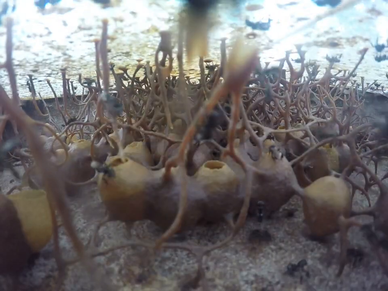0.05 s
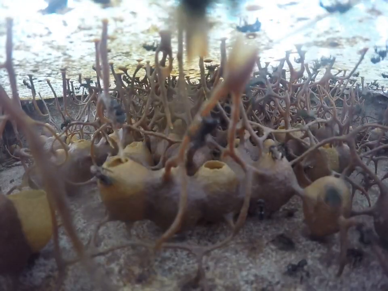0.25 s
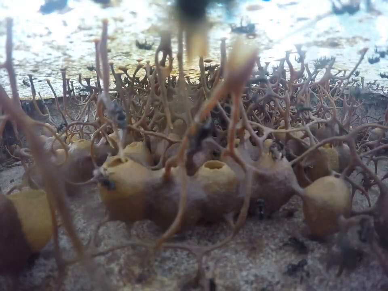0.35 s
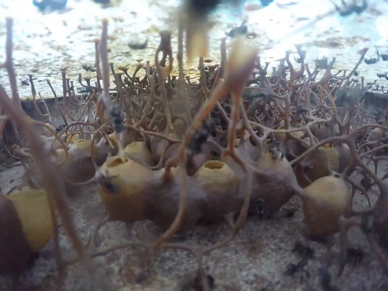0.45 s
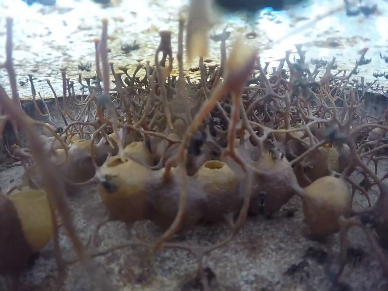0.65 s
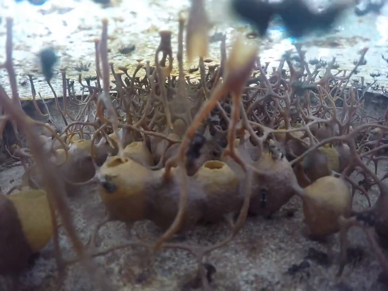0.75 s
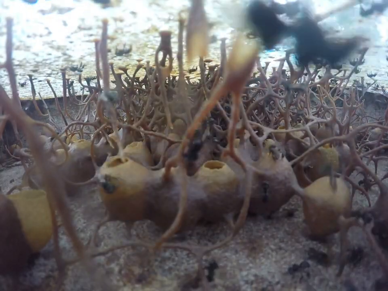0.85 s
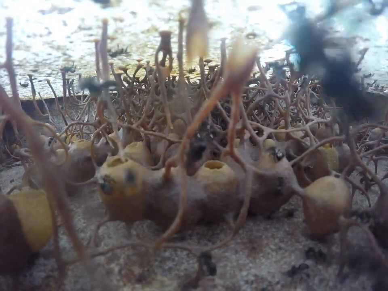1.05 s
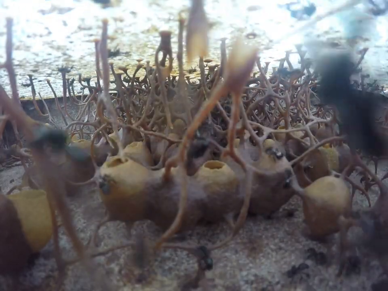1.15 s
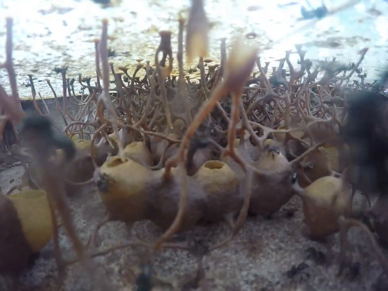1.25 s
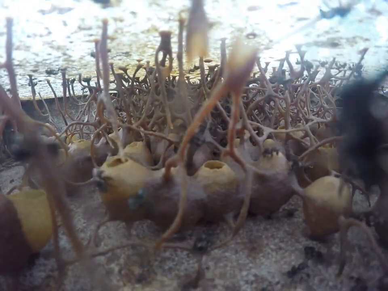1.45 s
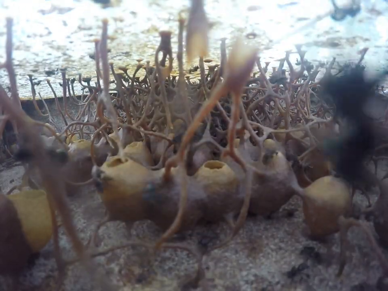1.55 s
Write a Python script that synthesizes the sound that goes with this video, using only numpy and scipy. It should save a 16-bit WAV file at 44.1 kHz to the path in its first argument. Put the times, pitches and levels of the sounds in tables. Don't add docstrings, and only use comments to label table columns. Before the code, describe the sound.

One brief harsh bee buzz against a hard shell, followed by tiny foot ticks and soft scraping

```python
import sys
import numpy as np
from scipy import signal
from scipy.fft import rfft, irfft
from scipy.io import wavfile

SR = 44100
rng = np.random.default_rng(int(sys.argv[2]) if len(sys.argv) > 2 else 0)


def file_out(sig):
    cols = np.atleast_2d(sig).T
    lim = np.clip(cols, -1, 1)
    pcm = np.round(lim * 32767).astype(np.int16)
    wavfile.write(sys.argv[1], SR, pcm)


def gain_from_decibels(decibels):
    exponent = np.asarray(decibels, float) / 20
    return 10 ** exponent


N = 70560

# (time [s], wingbeat [Hz], wing hum level [dB], slap level [dB])
BUZZ = [
    (0.185, 252.5, -72, -58),
    (0.197, 243.6, -52, -42.5),
    (0.226, 229, -50, -37.5),
    (0.232, 238.2, -47, -12),
    (0.243, 235.5, -44, -26.5),
    (0.297, 241, -42, -25),
    (0.321, 282.8, -46.5, -34),
    (0.33, 285, -62, -46),
    (0.346, 252, -81, -44.5),
]
# (multiple of wingbeat [1], level [dB])
OVERTONES = [(1, -24), (2, -19), (3, -14), (4, -11), (5, -10.5), (6, -9.5), (7, -13.5), (8, -5), (9, 1),
             (10, -1), (11, 3), (12, -4), (13, 0), (14, -4), (15, -10), (16, -14), (17, -16), (18, -16),
             (19, -15), (20, -16), (21, -18)]
# (time [s], peak level [dB])
BLOWS = [
    (.1999, -26),
    (.2290, -14.5),
    (.2332, -12),
    (.2374, -13),
]
# (frequency [Hz], level [dB], t60 [s])
SHELL_MODES = [(2110, -11, 0.019), (2550, 1.5, 0.0078), (3200, -4.5, 0.014), (3680, -3, 0.0075),
               (4800, 1, 0.0049), (6840, -0.5, 0.0058), (7740, 0, 0.003), (9790, -4.5, 0.0031),
               (12380, -20.5, 0.0096), (14600, -17.5, 0.0023)]
# (time [s], peak level [dB], pitch [Hz], share in the shell [dB])
TICKS = [(0.1472, -27.5, 2800, -18), (0.351, -33, 1990, -8), (0.363, -33, 2610, -16),
         (0.383, -46, 2720, -13), (0.423, -23, 1930, -10), (0.4317, -24, 6960, -12),
         (0.4363, -25, 3330, -3), (0.4406, -25.5, 4000, -2), (0.4556, -28, 2670, -14),
         (0.4735, -37, 2300, -12), (0.4930, -29.5, 1810, -9), (0.5125, -32, 1880, -14),
         (0.5242, -34, 3700, -8), (0.5791, -32.5, 1930, -20), (0.6186, -31, 2060, -3),
         (0.6284, -35, 1590, -10), (0.6386, -25, 1950, -8), (0.6454, -31, 1670, -11),
         (0.6485, -30, 2100, -14), (0.6610, -33, 1900, -10), (0.6712, -32, 2200, -6),
         (0.6770, -21.5, 2800, -10), (0.779, -35, 2700, -18), (0.7865, -36, 2720, -6),
         (0.9547, -28.5, 1800, -9.5), (0.9673, -32, 3000, -16), (0.9960, -39, 3000, -4),
         (1.0173, -39, 3300, -14), (1.0275, -27.5, 3960, -12), (1.0305, -30, 2900, -2),
         (1.0632, -24, 2920, -23), (1.1749, -29.5, 1430, -9), (1.1834, -29, 2900, 1.5),
         (1.1860, -32.5, 4500, 3), (1.2067, -29.5, 4800, 2.5), (1.2080, -28.5, 2700, 1),
         (1.2406, -30.5, 5500, 1.5), (1.3172, -31.5, 3020, -1), (1.3675, -33.5, 2580, 2),
         (1.3827, -29, 2980, -3), (1.4015, -28, 3250, -3.5)]
# (time [s], length [s], level [dB], pitch [Hz], share in the shell [dB])
SCRAPES = [(0.121, 0.019, -58, 3000, 10), (0.319, 0.018, -41.5, 2650, -2), (0.371, 0.058, -49, 2550, 4),
           (.338, 0.042, -52, 2550, -6), (0.437, 0.016, -44, 3850, -2), (0.472, 0.014, -50, 2300, -14),
           (0.499, 0.037, -50, 2900, -4), (0.65, 0.0069, -50, 2530, -8), (0.773, 0.025, -53.5, 2440, -3.5),
           (0.83, 0.014, -55, 4800, 1.5), (0.868, 0.0096, -51, 3460, 1), (1.02, 0.014, -50, 3860, -12),
           (1.024, 0.013, -60, 2600, -14), (1.056, 0.0052, -48.5, 3000, -2), (1.065, 0.0053, -48, 2820, -5),
           (0.676, 0.0065, -46, 2900, -1), (1.085, 0.014, -54.5, 4360, 4), (.922, 0.0047, -54, 4400, 1),
           (.926, .012, -57, 2530, -8), (1.104, 0.01, -57.5, 3200, 5), (0.742, 0.0073, -50, 3280, -15),
           (1.240, 0.01, -48.5, 4300, 5.5), (1.389, 0.017, -52.5, 1740, 4), (1.42, 0.062, -57, 3200, 5),
           (1.494, 0.012, -51, 4800, -6), (1.508, 0.0048, -46.5, 4800, -4), (1.512, 0.02, -56, 4800, -8),
           (1.594, 0.0072, -51, 4500, -3), (1.579, 0.011, -51, 4400, -5)]
# (time [s], peak level [dB])
CLAWS = [(1.354, -46), (1.393, -54), (1.406, -43), (1.427, -39), (1.434, -40.5), (1.441, -41), (1.455, -46),
         (1.481, -42), (1.489, -41), (1.498, -47), (1.509, -43), (1.523, -45), (1.537, -46), (.506, -38),
         (.656, -43)]
# (time [s], level [dB])
BUSTLE = [
    (0, -57),
    (.18, -59),
    (.33, -49.5),
    (.47, -54),
    (.7, -57),
    (1.0, -57),
    (1.3, -57),
    (1.5, -57),
    (1.6, -62.5),
]
# (frequency [Hz], density [dB per Hz])
RUSTLE_SPECTRUM = [(590, -1.5), (1000, -5), (3630, 6.5), (4210, 4), (5930, -8.5), (6880, -1.5),
                   (11200, -11), (12600, -1.5), (15300, -29)]
# (frequency [Hz], density [dB per Hz])
AIR_SPECTRUM = [(12, -4), (20, 4.5), (140, -6.5), (201, -8), (280, -10), (761, -10.5), (2810, -14),
                (12600, -27.5), (15300, -26.5)]
# (frequency [Hz], width [Hz], level [dB])
COLONY = [
    (45.2, 10, -60.5),
    (131.5, 40, -60.5),
    (285, 55.5, -64.5),
]

BEAT_AT_S, LOW_OVERTONES = 0.2332, 7
HUM_DB, BODY_DB = 9.5, -11
WOBBLE_DB, SCATTER_TURNS = 2.5, 0.45
LOW_FRAY_TURNS, UPPER_FRAY_TURNS, HOVER_HZ, FRAY_PER_HZ = 0.028, 0.035, 240, 0.03
HOLLOW_HZ, HOLLOW_WIDTH_HZ, HOLLOW_DB = 864, 68, 10
SLAP_DB, SLAP_TILT_DB, SLAP_JITTER_S, SLAP_SPREAD_DB = -4.5, 4, 0.00016, 3
BACKSTROKE_DB, RATTLE_DB, RATTLE_PER_S = -6, -10, 1200
BRIGHT_PER_DB, FULL_DB = 0.25, -27
BLOW_DB, BLOW_TILT_DB, BLOW_ECHO_S, BLOW_ECHO_DB = -10.5, 3.5, 0.000689, -8.5
TICK_CYCLES, TICK_SLIP_S, SLIPS_PER_S, SLIP_SHARE = 3.4, 0.0012, 4000, 0.4
GRIT_PER_S, GRIT_CYCLES, STROKE_RISE, STROKE_FALL = 8000, 4.0, 0.15, 0.34
CLAW_HZ, CLAW_CYCLES, CLAW_SHELL_DB = 12900, 19, -0.5
TOUCH_DAMPING, THUMP_CUT_HZ = 2.5, 600
STEPS_PER_S, STEP_SPREAD_DB, STEPS_DB, RUSTLE_DB = 1200, 3.5, -2, -5.5
AIR_DB, CUTOFF_HZ = -54, 15500


def rms_one(x):
    return x / np.sqrt(np.mean(x ** 2) + 1e-20)


def in_time(rows):
    s, *columns = np.transpose(rows)
    return [np.interp(np.arange(N) / SR, s, column) for column in columns]


def drift(rate_hz):
    r = np.exp(-2 * np.pi * rate_hz / SR)
    return rms_one(signal.lfilter([1], [1, -2 * r, r * r], rng.standard_normal(N + SR))[SR:])


def ring(clicks, hz, t60_s):
    r, w = gain_from_decibels(-60 / (t60_s * SR)), 2 * np.pi * hz / SR
    return signal.lfilter([0, np.sin(w)], [1, -2 * r * np.cos(w), r * r], clicks + 1e-18)


def ring_twice(x, hz, t60_s):
    return ring(ring(x, hz, t60_s), hz, t60_s)


def coloured(x, spectrum):
    hz, db = np.transpose(spectrum)
    axis_hz = np.maximum(np.arange(N // 2 + 1) * SR / N, 1)
    gain = gain_from_decibels(np.interp(np.log(axis_hz), np.log(hz), db))
    return rms_one(irfft(rfft(x) * gain, N))


def struck_shell(s, db, tilt_db, spread_db):
    out = np.zeros(N)
    luck = rng.normal(0, 1, (len(s), len(SHELL_MODES)))
    at = (s * SR).astype(int)
    for k, (hz, mode_db, t60_s) in enumerate(SHELL_MODES):
        clicks = np.zeros(N)
        strike_db = db + mode_db + tilt_db * np.log2(hz / 3000) + spread_db * luck[:, k]
        np.add.at(clicks, at, gain_from_decibels(strike_db))
        out += (-1) ** k * ring(clicks, hz, t60_s)
    return out


def wing_hum(beat_hz, turns, hum_db, slap_db, unstruck):
    out = np.zeros(N)
    unsteady = 1 + FRAY_PER_HZ * np.maximum(beat_hz - HOVER_HZ, 0)
    for k, db in OVERTONES:
        low = k <= LOW_OVERTONES
        hollow_db = HOLLOW_DB * np.exp(-((k * beat_hz - HOLLOW_HZ) / HOLLOW_WIDTH_HZ) ** 2)
        level = gain_from_decibels(db + hollow_db + WOBBLE_DB * drift(43))
        fray_turns = (LOW_FRAY_TURNS if low else UPPER_FRAY_TURNS) * unsteady * drift(34)
        phase = k * turns + SCATTER_TURNS * rng.random() + fray_turns
        strength = gain_from_decibels(hum_db + HUM_DB) if low else unstruck * gain_from_decibels(slap_db + BODY_DB)
        out += strength * level * np.sin(2 * np.pi * phase)
    return out


def wing_slaps(turns, slap_db, active):
    half = np.floor(2 * turns)
    at = np.flatnonzero((np.diff(half) > 0) & active[1:])
    luck = np.clip(rng.normal(0, 1, (len(at), 2)), -1.5, 1.5)
    s = at / SR + SLAP_JITTER_S * luck[:, 0]
    backstroke = half[at + 1] % 2
    db = slap_db[at] + SLAP_DB + BACKSTROKE_DB * backstroke + SLAP_SPREAD_DB * luck[:, 1]
    tilt_db = SLAP_TILT_DB + BRIGHT_PER_DB * np.minimum(slap_db - FULL_DB, 0)
    out = np.zeros(N)
    for k in range(2):
        out += struck_shell(s + k * BLOW_ECHO_S, db + k * BLOW_ECHO_DB, tilt_db[at], 0.52)
    loose = np.flatnonzero((rng.random(N) < RATTLE_PER_S / SR) & active)
    return out + struck_shell(loose / SR, slap_db[loose] + RATTLE_DB, tilt_db[loose] - 3, 4.2)


def wing_blows():
    s, db = np.transpose(BLOWS)
    return sum(struck_shell(s + k * BLOW_ECHO_S, db + BLOW_DB + k * BLOW_ECHO_DB, BLOW_TILT_DB, 2.2)
               for k in range(3))


def buzz():
    beat_hz, hum_db, slap_db = in_time(BUZZ)
    t = np.arange(N) / SR
    on = np.clip(np.minimum(t - BUZZ[0][0], BUZZ[-1][0] - t) / 0.0048, 0, 1)
    first_s, last_s = BLOWS[1][0] - 0.001, BLOWS[-1][0] + 0.003
    unstruck = np.clip(np.maximum(first_s - t, t - last_s) / 0.001, 0, 1)
    turns = np.cumsum(beat_hz) / SR
    turns = turns - turns[int(BEAT_AT_S * SR)]
    hum = wing_hum(beat_hz, turns, hum_db, slap_db, unstruck)
    return on * hum + wing_slaps(turns, slap_db, on * unstruck > 0) + wing_blows()


def touched_shell(clicks):
    return sum((-1) ** k * gain_from_decibels(db) * ring(clicks, hz, t60_s / TOUCH_DAMPING)
               for k, (hz, db, t60_s) in enumerate(SHELL_MODES))


def ticks():
    out, to_shell = np.zeros(N), np.zeros(N)
    size = 800
    age_s = np.arange(size) / SR
    fade = np.clip(1 - age_s / TICK_SLIP_S / 2, 0, 1)
    for s, db, hz, shell_db in TICKS:
        slipping = rng.random(size) < SLIPS_PER_S / SR
        slips = SLIP_SHARE * slipping * rng.uniform(-1, 1, size) * fade
        slips[0] = -1
        burst = slips * np.where(age_s > 0, 1 / SLIP_SHARE, 0.6)
        own = ring_twice(slips, hz, TICK_CYCLES / hz)
        i = int(s * SR)
        out[i:i + size] += gain_from_decibels(db - 5) * own / np.abs(own).max()
        to_shell[i:i + size] += gain_from_decibels(db - 4.5 + shell_db) * burst / np.sqrt(np.sum(burst ** 2))
    return out + touched_shell(to_shell)


def scrapes():
    out, to_shell, t = np.zeros(N), np.zeros(N), np.arange(N) / SR
    grains = (rng.random(N) < GRIT_PER_S / SR) * rng.normal(0, 1, N)
    grit = rms_one(grains) * gain_from_decibels(1.5 * drift(120))
    for s, length_s, db, hz, shell_db in SCRAPES:
        edges_s = np.minimum((t - s) / STROKE_RISE, (s + length_s - t) / STROKE_FALL)
        stroke = grit * gain_from_decibels(db) * np.clip(edges_s / length_s, 0, 1)
        t60_s = GRIT_CYCLES / hz
        out += ring_twice(stroke, hz, t60_s) / np.std(ring_twice(grit, hz, t60_s))
        to_shell += stroke * gain_from_decibels(shell_db)
    return out + touched_shell(to_shell) / np.std(touched_shell(grit))


def claws():
    clicks = np.zeros(N)
    for s, db in CLAWS:
        clicks[int(s * SR)] = gain_from_decibels(db)
        clicks[int((s + rng.uniform(0.0003, 0.001)) * SR)] = -0.7 * gain_from_decibels(db)
    return ring(clicks, CLAW_HZ, CLAW_CYCLES / CLAW_HZ) + gain_from_decibels(CLAW_SHELL_DB) * touched_shell(clicks)


def crowd():
    level_db, = in_time(BUSTLE)
    sizes = gain_from_decibels(STEP_SPREAD_DB * np.minimum(rng.exponential(1, N), 4)) * rng.choice([-1, 1], N)
    born = rng.random(N) < STEPS_PER_S * gain_from_decibels(5 * drift(25)) / SR
    pitch = rng.integers(0, 16, N)
    steps = np.zeros(N)
    for k, hz in enumerate(np.geomspace(1200, 14000, num=16)):
        steps += ring(sizes * born * (pitch == k), hz, 2.26 / hz) * np.sqrt(hz)
    rustle = rng.standard_normal(N) * gain_from_decibels(4.0 * drift(13))
    steps = gain_from_decibels(STEPS_DB) * coloured(steps, RUSTLE_SPECTRUM)
    rustle = gain_from_decibels(RUSTLE_DB) * coloured(rustle, RUSTLE_SPECTRUM)
    return gain_from_decibels(level_db) * (steps + rustle)


def colony():
    out = gain_from_decibels(AIR_DB) * coloured(rng.standard_normal(N), AIR_SPECTRUM)
    for hz, width_hz, db in COLONY:
        band = ring_twice(rng.standard_normal(N + SR), hz, 2.2 / width_hz)[SR:]
        out = out + gain_from_decibels(db + 1.5 * drift(4)) * rms_one(band)
    return out


def scene():
    touches = ticks() + scrapes() + claws()
    no_thump = signal.butter(2, THUMP_CUT_HZ, "high", fs=SR, output="sos")
    return (buzz() + signal.sosfilt(no_thump, touches) + crowd() + colony())[None]


def roll_off(x):
    return signal.sosfilt(signal.butter(12, 16270, fs=SR, output="sos"), x)


def record(dry):
    low_pass = signal.cheby2(14, 30, CUTOFF_HZ, fs=SR, output="sos")
    return roll_off(signal.sosfilt(low_pass, dry))


dry = scene()
out = record(dry)
file_out(out)
```